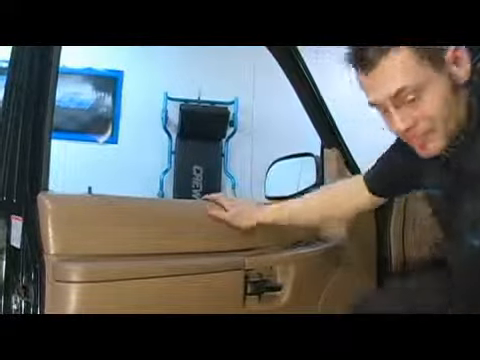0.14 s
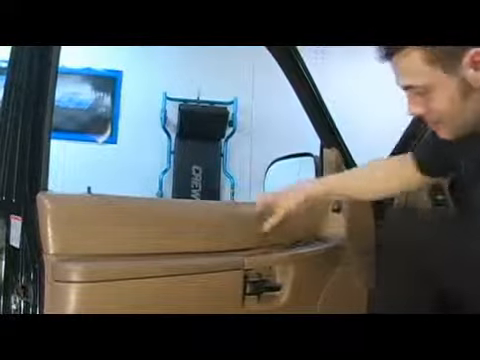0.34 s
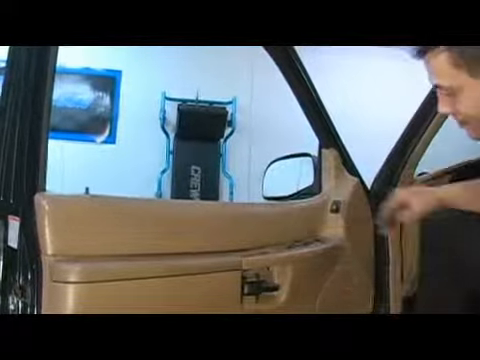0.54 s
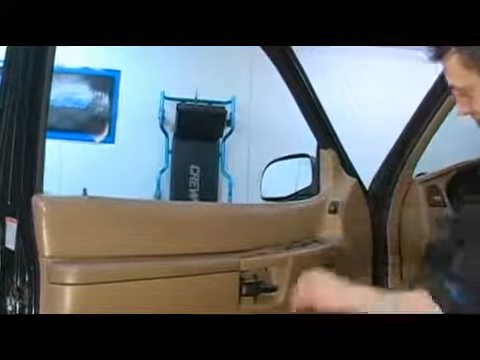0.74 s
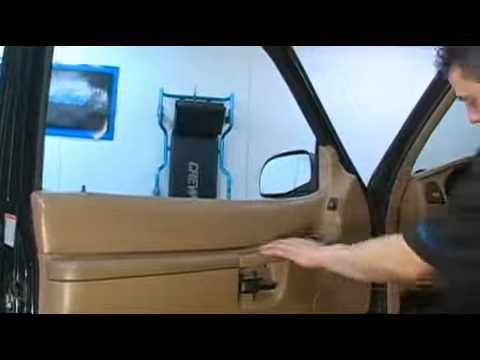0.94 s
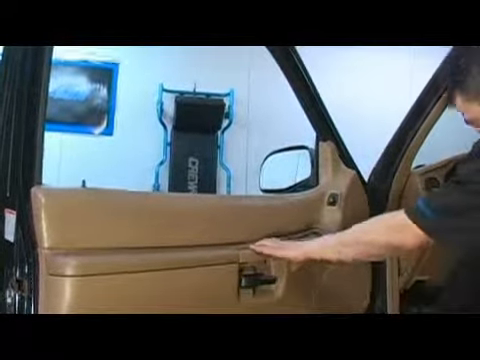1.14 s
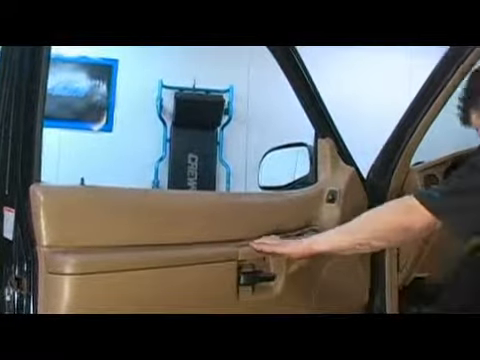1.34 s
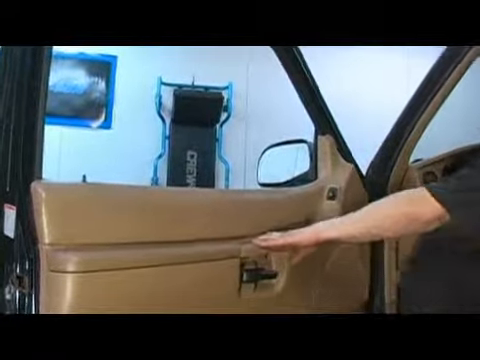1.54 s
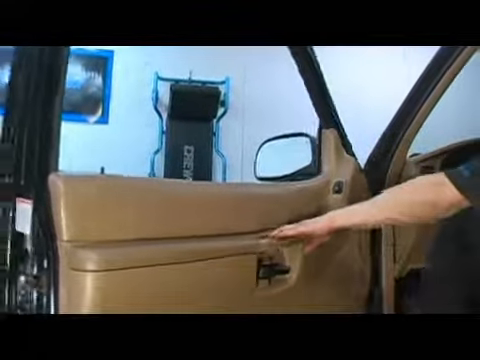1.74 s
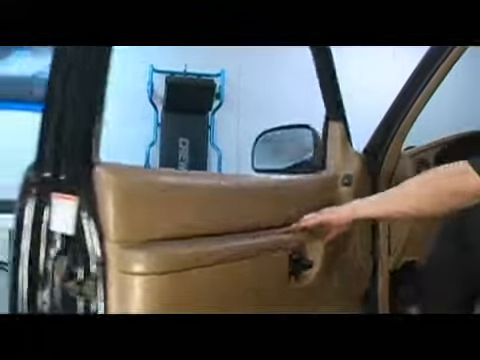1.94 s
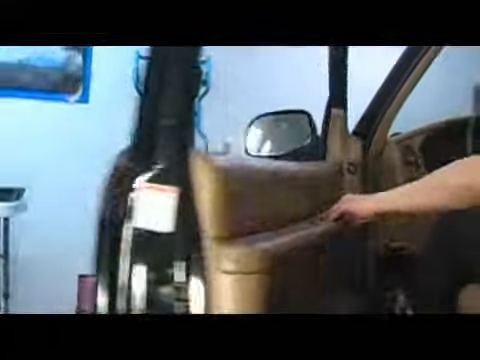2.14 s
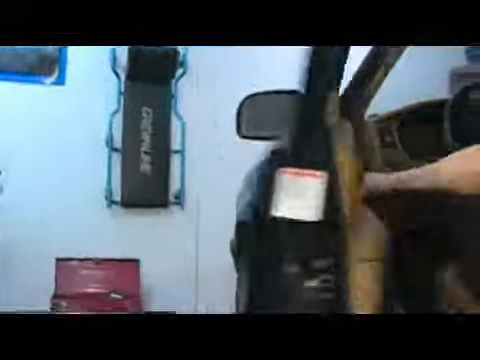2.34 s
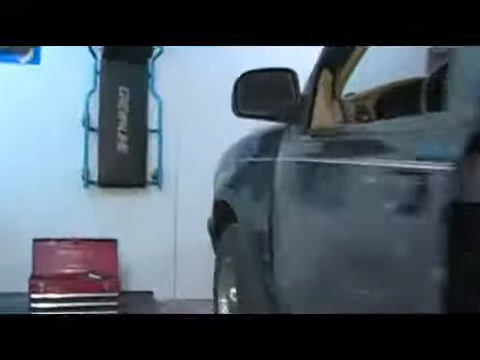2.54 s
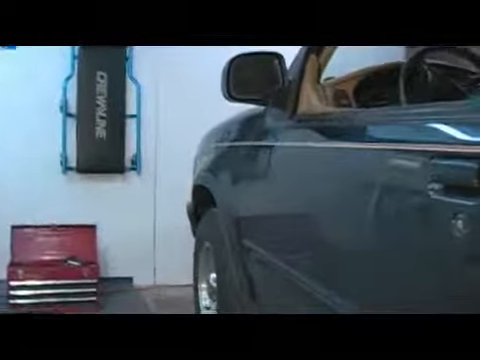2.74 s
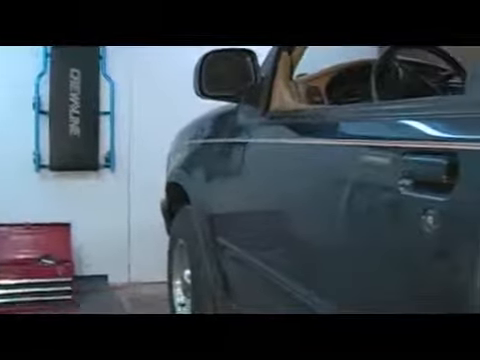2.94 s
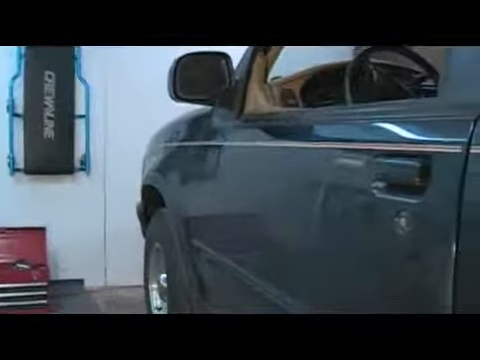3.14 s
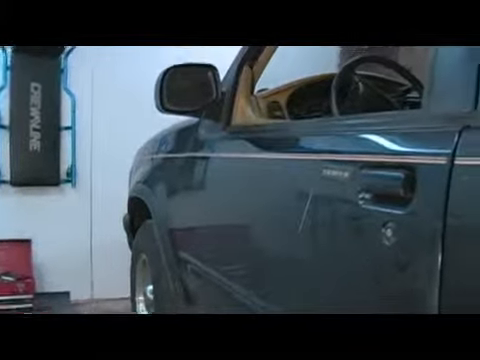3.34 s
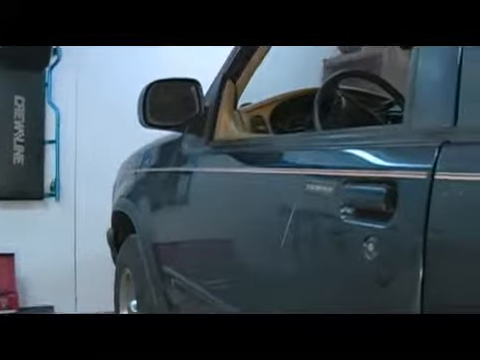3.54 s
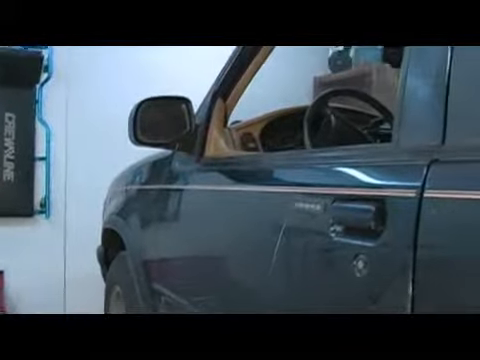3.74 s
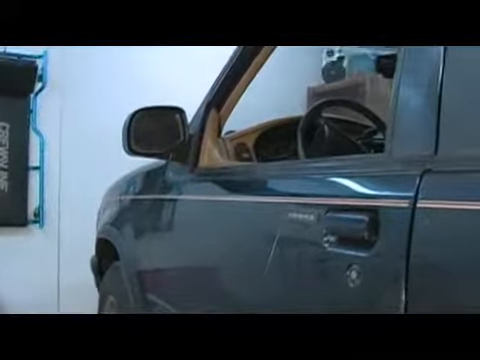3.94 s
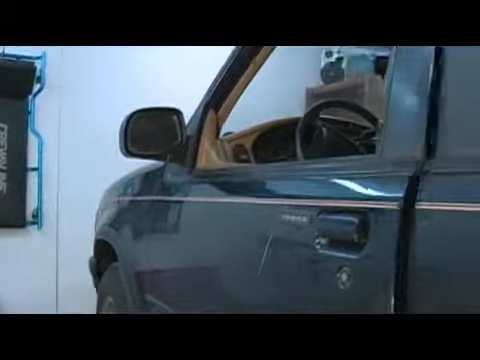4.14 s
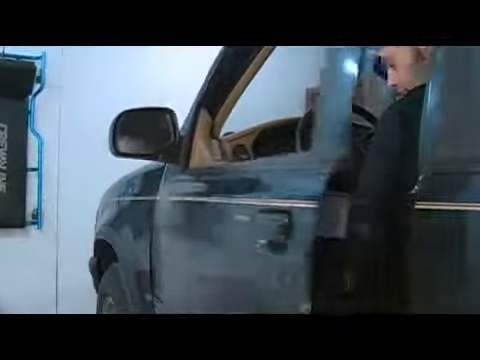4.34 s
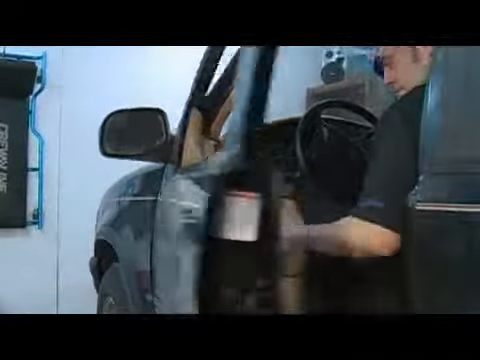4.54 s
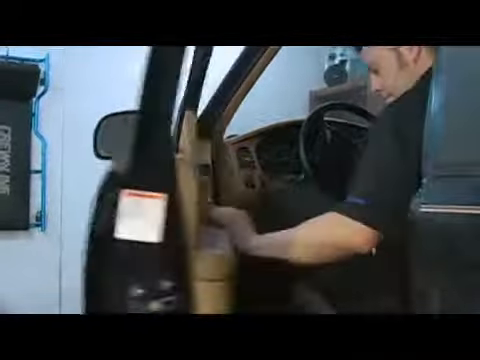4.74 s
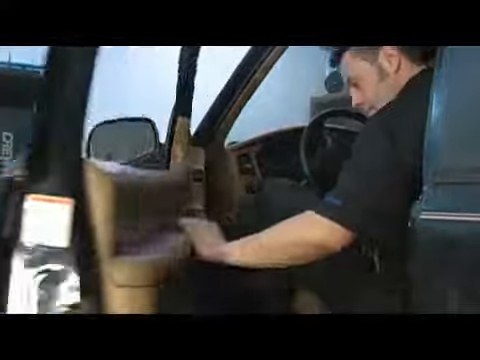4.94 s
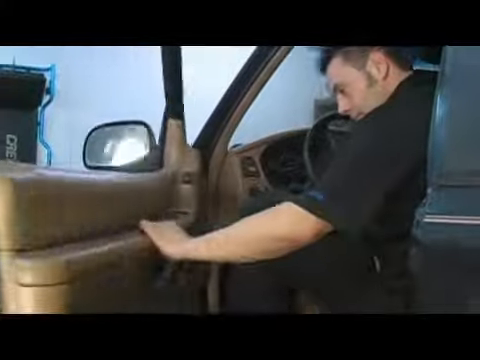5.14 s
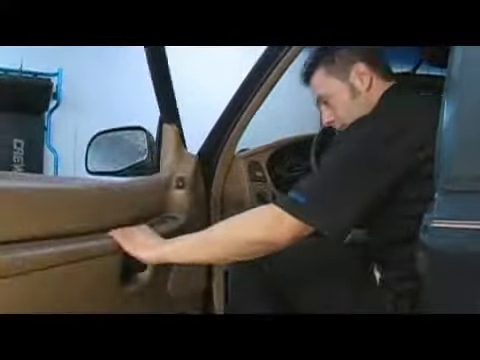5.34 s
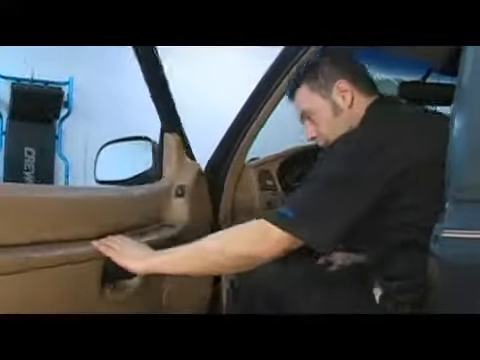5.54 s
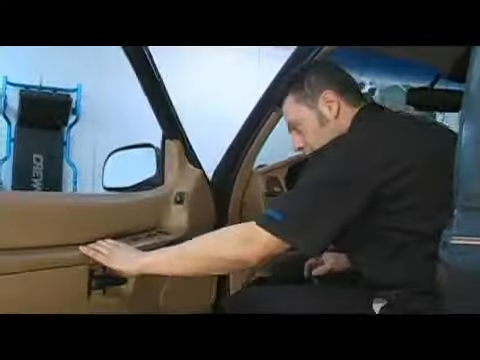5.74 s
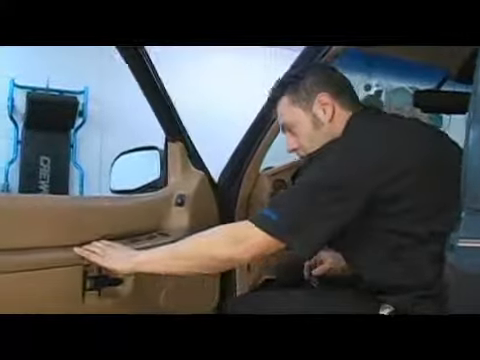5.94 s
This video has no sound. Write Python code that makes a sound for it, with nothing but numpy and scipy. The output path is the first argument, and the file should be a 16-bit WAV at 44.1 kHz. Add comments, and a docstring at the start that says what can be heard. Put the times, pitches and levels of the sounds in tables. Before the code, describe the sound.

After soft rustling and creaks, a car door thuds shut, then opens with several latch clicks and a sharp snap.

```python
"""A car door is pulled shut in a workshop, then unlatched from inside and pushed open until the handle
snaps back. Each blow shakes loose parts against sheet metal and rings on in the hard room, and the
moving door makes the air in the cabin boom. The driver's clothes rustle, the seat creaks and the lamps
hum. The microphone is close enough to overload, and is brushed once near the end."""
import sys
import numpy as np
from scipy import signal
from scipy.fft import rfft, irfft
from scipy.io import wavfile

SR = 44100
rng = np.random.default_rng(int(sys.argv[2]) if len(sys.argv) > 2 else 0)


def digitize_waveform(pressure):
    """Quantize a signal to 16-bit integers and store it at the path in sys.argv[1].

    Rows of a 2-D input are taken as channels; values are limited to [-1, 1].
    """
    field = np.atleast_2d(pressure).T
    bounded = np.clip(field, -1, 1)
    quanta = np.round(bounded * 32767).astype(np.int16)
    wavfile.write(sys.argv[1], SR, quanta)


N = 268657
TIME = np.arange(N) / SR
SLAM_S = 2.632   # when the door shuts


def from_db(db):
    """Turn decibels into a gain. A "fade time" below is the time a sound takes to drop 60 dB."""
    return 10 ** (np.asarray(db) / 20)


def rms_one(x):
    """Scale a signal so that its average strength (rms) is 1."""
    return x / np.sqrt(np.mean(x ** 2) + 1e-20)


def in_time(rows):
    """Join rows of (time, values...) with straight lines: one curve for each value column."""
    times, *columns = np.transpose(rows)
    return [np.interp(TIME, times, column) for column in columns]


def at_hz(points, hz):
    """Look up rows of (frequency, value), with every octave equally wide."""
    frequencies, values = np.transpose(points)
    return np.interp(np.log(hz), np.log(frequencies), values)


def band(x, low_hz, high_hz):
    """Keep the sound between two frequencies."""
    return signal.sosfilt(signal.butter(2, [low_hz, high_hz], "band", fs=SR, output="sos"), x)


def colour(x, spectrum):
    """Give a noise the tone set by rows of (frequency, level), at strength 1."""
    hz = np.maximum(np.fft.rfftfreq(len(x), 1 / SR), 1)
    return rms_one(irfft(rfft(x) * from_db(at_hz(spectrum, hz)), len(x)))


def grains(per_s, spread_db):
    """Tiny contacts at random times; spread_db makes their sizes uneven."""
    sizes = from_db(spread_db * np.minimum(rng.exponential(1, N), 4)) * rng.choice([-1, 1], N)
    return rms_one(sizes * (rng.random(N) < per_s / SR))


def drift(rate_per_s):
    """A slow wander: random points joined by lines."""
    points = rng.standard_normal(400)
    return np.interp(TIME * rate_per_s, np.arange(len(points)), points)


def ring(force, tones):
    """A shaken object rings at its own tones, each dying away at its own rate."""
    out = 0
    for hz, level_db, fade_s in tones:
        decay, angle = from_db(-60 / (fade_s * SR)), 2 * np.pi * hz / SR   # per sample
        gain = from_db(level_db) * np.sin(angle) * np.sqrt(1 - decay ** 2)
        out = out + signal.lfilter([0, gain], [1, -2 * decay * np.cos(angle), decay ** 2], force + 1e-18)
    return out


def hum_and_hiss():
    """The lamps' ballast coils hum over steady air noise and amplifier hiss."""
    # tones of the hum: (frequency [Hz], rms level [dB])
    lamp_tones = [(118.4, -60.5), (150.7, -65.5), (242.2, -66), (360.7, -63.5), (479.1, -73.5),
                  (543.7, -76), (597.5, -68.5), (721.4, -73), (839.8, -72)]
    # tone of the air and hiss: (frequency [Hz], relative level [dB])
    air_spectrum = [(15, -4), (25, 12.5), (125, 3.5), (289, -0.5), (357, -1), (418, -5), (604, -13.5),
                    (9840, -15), (12200, -10.5), (13500, -65)]
    hum = sum(np.sqrt(2) * from_db(db) * np.sin(2 * np.pi * (hz * TIME + rng.random()))
              for hz, db in lamp_tones)
    return hum + from_db(-62) * colour(rng.standard_normal(N), air_spectrum)


def driver():
    """As the driver moves, the seat crackles, cloth swishes and the car rocks on its springs."""
    # the driver's movements: (time [s], seat level [dB], cloth level [dB])
    movements = [(0.0, -59.5, -63.5), (0.43, -58, -58.5), (0.6, -47, -58), (0.75, -52, -59.5),
                 (1.08, -53, -64), (1.18, -53, -59), (1.49, -47, -60.5), (1.62, -59.5, -62),
                 (1.95, -56.5, -63), (2.11, -49, -63), (2.28, -62, -58.5), (2.6, -58, -64.5),
                 (3.0, -51.5, -61.5), (3.1, -59, -68), (3.33, -65.5, -65), (3.55, -69, -74.5),
                 (3.97, -58.5, -68), (4.48, -57, -57.5), (4.74, -50, -68), (4.94, -58.5, -61.5),
                 (5.43, -57.5, -62.5), (5.84, -66, -65.5), (6.09, -54, -60.5)]
    # dull tone of the seat: (frequency [Hz], relative level [dB])
    seat_spectrum = [(59, -21.5), (100, 2), (478, -2), (833, -4.5), (961, -7), (1060, -10), (1190, -12.5),
                     (3000, -26), (3900, -46), (6600, -120)]
    # bright tone of the cloth: (frequency [Hz], relative level [dB])
    cloth_spectrum = [(710, -31), (1200, 4.5), (1710, -1), (3210, -2), (6670, -5), (12000, -13),
                      (15600, -61), (22000, -120)]
    # low rumble of the rocking car: (time [s], level [dB])
    rocking = [(0.0, -76), (0.43, -68), (0.72, -51), (1.1, -55.5), (1.7, -62), (1.93, -50), (2.4, -52.5),
               (2.6, -61), (3.05, -42), (3.19, -49.5), (3.33, -42.5), (3.5, -48.5), (3.65, -41.5),
               (3.85, -42), (4.0, -49.5), (4.53, -44.5), (4.94, -60.5), (5.17, -38), (5.25, -59),
               (5.8, -55), (6.09, -60)]
    seat_db, cloth_db = in_time(movements)
    fidget_db = 2 * drift(rate_per_s=9)
    seat = from_db(seat_db + fidget_db) * colour(grains(1500, spread_db=2), seat_spectrum)
    cloth = from_db(cloth_db + fidget_db) * colour(grains(5300, spread_db=0), cloth_spectrum)
    sway_db = in_time(rocking)[0] + 4.5 * drift(rate_per_s=9)
    sway = from_db(sway_db) * rms_one(band(rng.standard_normal(N), 21, 42))
    return seat + cloth + sway


def knocks(rows, knock_db, click_db, tick_db, crunch_db, click_slope, rise_s, width, touch_db):
    """Each knock is a dying burst of contacts; a sharper one has less knock, more click, tick, crunch."""
    out, contacts = np.zeros(N), grains(9000, spread_db=3)
    for start_s, level_db, thud_db, sharp_db, knock_hz, click_hz, fade_s in rows:
        start = round(start_s * SR)
        age = TIME[:min(N - start, SR // 3)]
        span = slice(start, start + len(age))
        burst = contacts[span] * from_db(-60 * age / fade_s) * np.clip(age / rise_s, 0, 1)
        burst[round(rise_s * SR)] += from_db(touch_db)   # the first hard touch
        parts = [(thud_db, 28, 150),
                 (knock_db - sharp_db, knock_hz / width, knock_hz * width),
                 (click_db + click_slope * sharp_db, click_hz / width, click_hz * width),
                 (tick_db + 1.64 * sharp_db, 2500, 8000),
                 (crunch_db + 0.81 * sharp_db, 250, 2600)]
        for share_db, low_hz, high_hz in parts:
            boost = np.sqrt(SR / 2 / (high_hz - low_hz))   # makes up for what a narrow band loses
            out[span] += from_db(level_db + share_db - 5) * boost * band(burst, low_hz, high_hz)
    return out


def trim_creaks():
    """The seat and the cabin's lining creak and tap softly."""
    # small knocks: (time [s], level [dB], thud share [dB], sharpness [dB], knock pitch [Hz],
    # click pitch [Hz], fade time [s])
    trim_hits = [(0.438, -37, -17, 4.5, 650, 802, 0.15), (0.662, -32.5, -22, -4, 370, 966, 0.027),
                 (0.694, -33, -23, -7.5, 368, 790, 0.032), (0.783, -31, -18, 4.5, 403, 735, 0.066),
                 (0.869, -30, -23, -4, 387, 800, 0.034), (0.884, -37.5, -19, 11, 310, 1670, 0.073),
                 (0.925, -30.5, -18, -2.5, 430, 745, 0.041), (0.992, -29, -15, -5, 406, 1240, .035),
                 (1.03, -38, -17, 2.5, 237, 945, 0.089), (1.138, -30.5, -22, 1, 454, 1700, 0.097),
                 (1.205, -37, -25, 1.5, 646, 1140, 0.18), (1.257, -31, -25, -0.5, 508, 1020, 0.28),
                 (1.388, -39.5, -24, 2, 470, 960, 0.34), (1.45, -35, -32, 0.5, 483, 1040, 0.19),
                 (1.508, -34, -25, -4, 530, 940, 0.08), (1.697, -36.5, -6.5, 3, 154, 1175, 0.077),
                 (1.901, -39.5, -2, -3, 254, 1966, 0.068), (2.009, -38.5, -4.5, 3, 188.5, 862, 0.061),
                 (2.068, -37.5, -0.5, -4, 757, 938, 0.16), (2.112, -37.5, -16, -9.5, 500.5, 822, 0.05),
                 (2.163, -36, -3, 15, 355, 1570, .06), (2.249, -39.5, -11, 5.5, 151, 909, 0.14),
                 (2.28, -41, -4.5, -1.5, 568, 1590, 0.13), (2.456, -38, -15, 6.5, 528, 1886, 0.29),
                 (3.498, -48.5, -15, -13, 254, 840, .06), (3.737, -39, -15.5, -7.5, 337, 840, 0.052),
                 (5.152, -47, 15, -9, 170, 820, .1), (5.272, -34, -21, 3, 209.6, 932, 0.11),
                 (5.889, -41, -18.5, -4, 152, 1290, 0.097), (6.056, -29.5, -16, -4.5, 304, 880, 0.069)]
    return knocks(trim_hits, knock_db=-6.5, click_db=-12.5, tick_db=-26, crunch_db=-8.5,
                  click_slope=0.33, rise_s=.0015, width=1.2, touch_db=16)


def shudder(strike_db, hold_db, hold_s, sag_db_per_s, fade_s):
    """Loudness curve of a slammed part: a sharp strike, a weakening shudder, then a fade."""
    rise_s, strike_fade_s = .003, 0.036
    age = np.maximum(TIME - SLAM_S, 0)
    strike = from_db(strike_db - 60 * age / strike_fade_s)
    sagging_db = hold_db - sag_db_per_s * np.minimum(age, hold_s)
    shaking = from_db(sagging_db - 60 * np.maximum(age - hold_s, 0) / fade_s)
    return np.clip(age / rise_s, 0, 1) ** 2 * (strike + shaking)


def door_slam():
    """The door squeezes air ahead of it, then the body thumps, the metal rings and loose parts rattle."""
    # tones of the door's shell and latch: (frequency [Hz], relative level [dB], fade time [s])
    door_tones = [(245, -2, .05), (363, 3, .05), (414, 0, .05), (520, -4, .04), (787, -2, .04),
                  (1089, -7, .04), (1620, -12, .015)]
    ahead_s = SLAM_S - TIME
    squeeze = from_db(-50.5 - 42 * ahead_s) * (ahead_s > 0) * (ahead_s < .18)
    thump = squeeze + shudder(strike_db=-30.5, hold_db=-21, hold_s=.28, sag_db_per_s=24.5, fade_s=0.7)
    thump *= rms_one(band(rng.standard_normal(N), 24, 57))
    body = shudder(strike_db=-20, hold_db=-10.5, hold_s=0.0929, sag_db_per_s=9, fade_s=0.16)
    body *= rms_one(band(grains(2000, spread_db=4.5), 60, 400))
    force = shudder(strike_db=-4, hold_db=-13, hold_s=0.09, sag_db_per_s=60.5, fade_s=0.1049)
    force *= grains(4000, spread_db=-1.5)
    panel = from_db(17.5) * band(force, 280, 1000) + from_db(-6) * ring(force, door_tones)
    rattle = shudder(strike_db=-11, hold_db=-11, hold_s=0.5, sag_db_per_s=142, fade_s=0.25)
    rattle *= rms_one(band(rng.standard_normal(N), 1200, 6600))
    return thump + body + panel + rattle


def latch_catch(start_s=2.635, level_db=-5, hz=2620, fade_s=.028):
    """The latch's steel claw rings briefly as it grips."""
    age = np.maximum(TIME - start_s, 0)
    return from_db(level_db - 60 * age / fade_s) * np.sin(2 * np.pi * hz * age)


def cabin_boom():
    """The door pumps the cabin's air; each push starts its low tones with an inward swing."""
    # pushes on the air: (time [s], level [dB])
    pushes = [(2.653, 0), (2.738, -7), (4.078, -14)]
    # tones of the cabin: (frequency [Hz], relative level [dB], fade time [s])
    cabin_tones = [(30, -3, .3), (60, -8, .25), (97, -6, .22), (165, -12, .15)]
    out = np.zeros(N)
    for start_s, push_db in pushes:
        age = np.maximum(TIME - start_s, 0)
        for hz, level_db, fade_s in cabin_tones:
            out -= from_db(push_db + level_db - 60 * age / fade_s) * np.sin(2 * np.pi * hz * age)
    return out


def opening_clacks():
    """The handle, rods, latch and hinge stop clack as the door opens."""
    # clacks: (time [s], level [dB], thud share [dB], sharpness [dB], knock pitch [Hz],
    # click pitch [Hz], fade time [s])
    latch_hits = [(3.993, -22, -19.5, -2.5, 345, 1530, 0.091), (4.043, -27.5, -1, 1.5, 320, 850, 0.17),
                  (4.073, -8, -15, -2.5, 445, 890, 0.063), (4.097, -23.5, 8, -3, 413, 1260, 0.056),
                  (4.155, -13, -14, 6, 850, 1110, 0.079), (4.19, -26, -15, -1.5, 676, 1090, 0.046),
                  (4.302, -22.5, -27, 13, 503, 2880, 0.063), (4.311, -16.5, -33, 10.5, 684, 2870, 0.075),
                  (4.328, -14.5, -12.5, -2.5, 275, 1230, 0.15), (4.355, -17, -18, -5, 248, 750, 0.061),
                  (4.378, -16.5, -30, 7, 240, 870, .025), (4.633, -29.5, -6, -5, 300, 800, 0.067),
                  (4.649, -30, -29, 7, 267, 830, .054), (4.686, -27.5, -40, -3, 520, 1050, 0.16),
                  (4.739, -39, -22, 8.5, 374, 1880, 0.13)]
    return knocks(latch_hits, knock_db=-4.5, click_db=-17, tick_db=-18, crunch_db=-9,
                  click_slope=1.26, rise_s=.003, width=1.6, touch_db=11)


def handle_snap(start_s=5.452, rise_s=0.0026, fade_s=0.076, shiver_s=.07):
    """A spring snaps the handle home: metal chatters on plastic and the handle rings briefly."""
    # tone of the chatter: (frequency [Hz], relative level [dB])
    chatter_spectrum = [(35, -44), (60, -16), (250, -20), (700, -7.5), (1100, -15.5), (1600, -12),
                        (2100, -18), (3000, -10.5), (4300, -10.5), (8000, -17.5), (12300, -37),
                        (14000, -41)]
    # tones of the handle: (frequency [Hz], relative level [dB], fade time [s])
    handle_tones = [(690, -4, .02), (1620, -4, .025), (2650, -3, .02), (3800, -3, .012), (4270, -3, .012),
                    (6080, -4, .015), (8200, -8, .015)]
    age = np.maximum(TIME - start_s, 0)
    strike = from_db(-1 - 60 * age / fade_s)
    shiver = from_db(-22) * (age < shiver_s)
    force = np.clip(age / rise_s, 0, 1) ** 2 * (strike + shiver)
    chatter = grains(12000, spread_db=0)
    return force * colour(chatter, chatter_spectrum) + from_db(-22) * ring(force * chatter, handle_tones)


def microphone_brush(at_s=5.7357, width_s=.00009, sway_hz=45, fade_s=0.09):
    """A touch on the microphone gives one inward pulse, then a slow sway back."""
    age = TIME - at_s
    pulse = -from_db(-10) * np.exp(-.5 * (age / width_s) ** 2)
    after = np.maximum(age, 0)
    sway = from_db(-27 - 60 * after / fade_s) * np.sin(2 * np.pi * sway_hz * after)
    return pulse + sway


def workshop_echo(x):
    """Hard walls return a wash of echoes, made of noise that dies at its own rate in each band."""
    # how long the room rings: (frequency [Hz], fade time [s])
    room_fades = [(40, .6), (150, 0.5), (600, 0.5), (2000, 0.52), (5000, 0.49), (10000, 0.29)]
    edges_hz, age = 25 * 2 ** np.arange(0, 9.6, .5), TIME[:SR]
    echoes = np.zeros(SR)
    for low_hz, high_hz in zip(edges_hz, edges_hz[1:]):
        fade_s = at_hz(room_fades, np.sqrt(low_hz * high_hz))
        echoes += band(rng.standard_normal(SR), low_hz, high_hz) * from_db(-60 * age / fade_s)
    echoes *= np.clip(age / 0.022, 0, 1)   # the first echoes take a moment to arrive
    return signal.fftconvolve(x, echoes / np.sqrt(np.sum(echoes ** 2)))[:N]


def scene():
    """One microphone hears it all, on two equal channels; only the blows echo."""
    blows = trim_creaks() + opening_clacks() + door_slam() + latch_catch() + handle_snap()
    echo = from_db(-10.5) * workshop_echo(blows)
    mix = blows + echo + cabin_boom() + driver() + microphone_brush() + hum_and_hiss()
    return np.array([mix, mix])


def record(dry, ceiling=0.64, low_cut_hz=12, soften_hz=12000, high_cut_hz=13900):
    """The amplifier flattens loud peaks, left and right part faintly, and the top treble is cut."""
    # tone of a faint copy added on the left and subtracted on the right: (frequency [Hz], gain [dB])
    side_spectrum = [(60, -38.5), (110, -34), (200, -37.5), (360, -40.5), (660, -37), (1200, -35),
                     (2190, -34.5), (4000, -26.5), (7280, -28), (13300, -20)]
    clipped = dry / (1 + np.abs(dry / ceiling) ** 3) ** (1 / 3)
    # cutting the deepest bass lets the flattened peaks sag
    sagged = signal.sosfilt(signal.butter(1, low_cut_hz, "high", fs=SR, output="sos"), clipped)
    hz = np.maximum(np.fft.rfftfreq(N, 1 / SR), 1)
    late = np.roll(sagged[0], 300)   # about 7 ms late
    side = irfft(rfft(late) * from_db(at_hz(side_spectrum, hz)), N)
    stereo = sagged + side * [[1], [-1]]
    softened = signal.sosfilt(signal.butter(4, soften_hz, fs=SR, output="sos"), stereo)
    return signal.sosfilt(signal.cheby2(12, 70, high_cut_hz, fs=SR, output="sos"), softened)


dry = scene()
out = record(dry)
digitize_waveform(out)
```